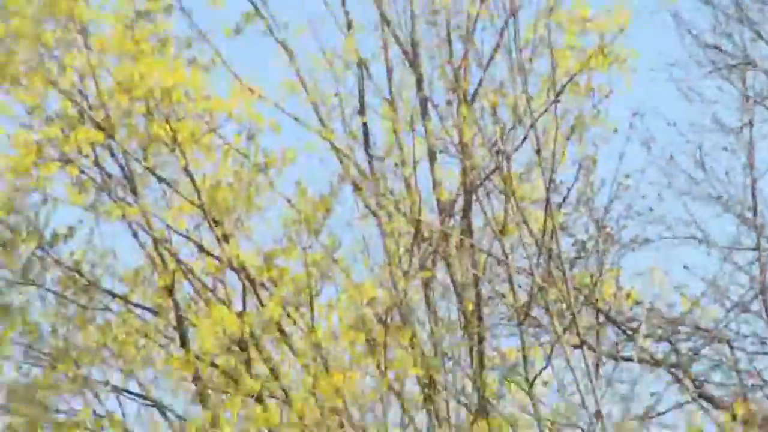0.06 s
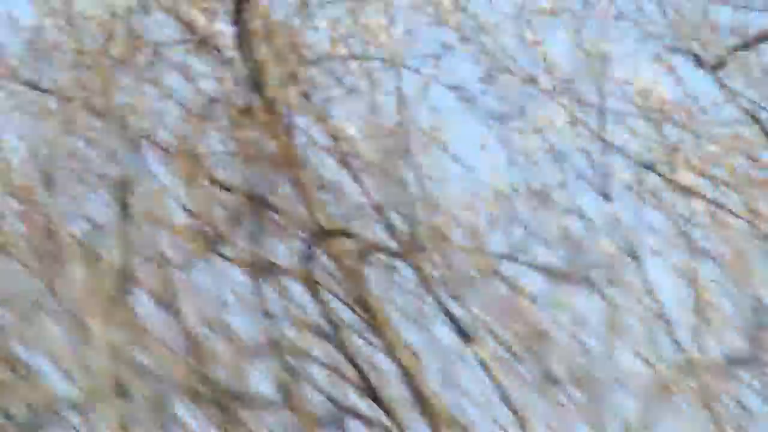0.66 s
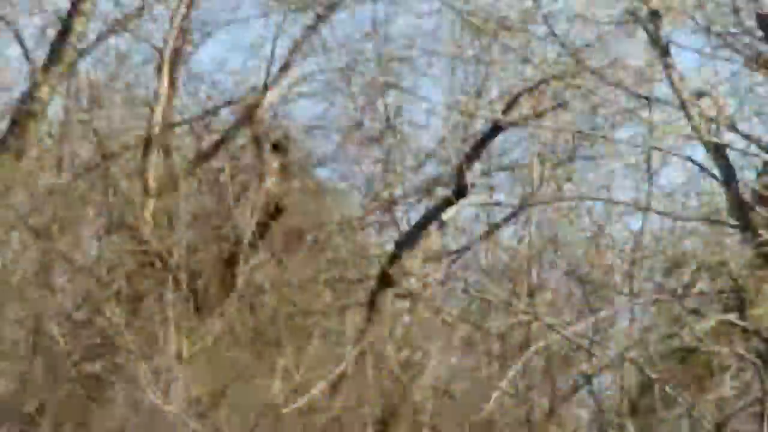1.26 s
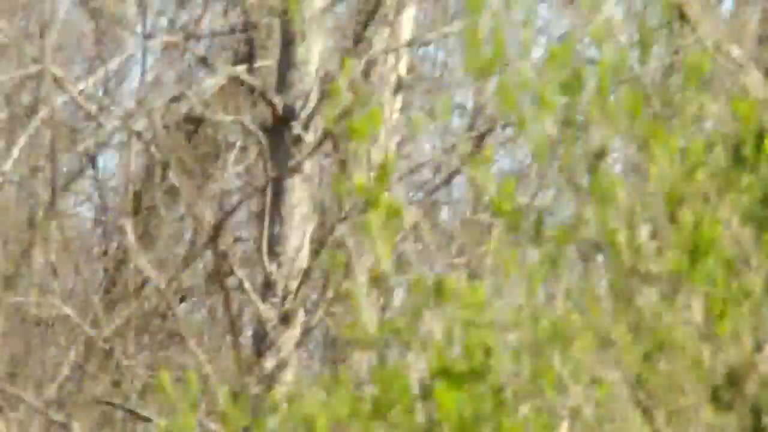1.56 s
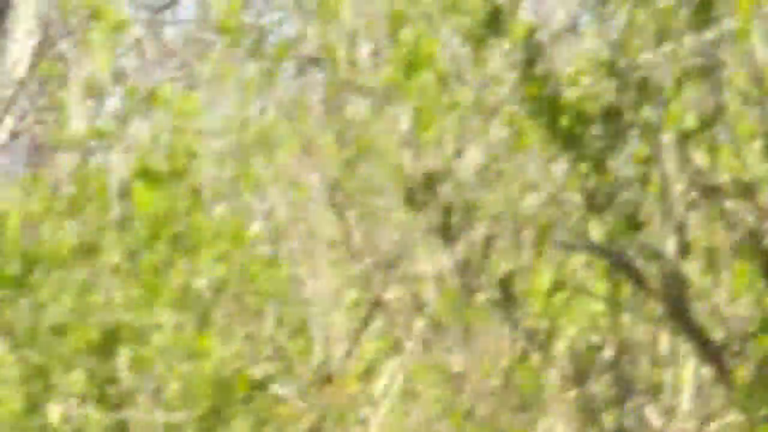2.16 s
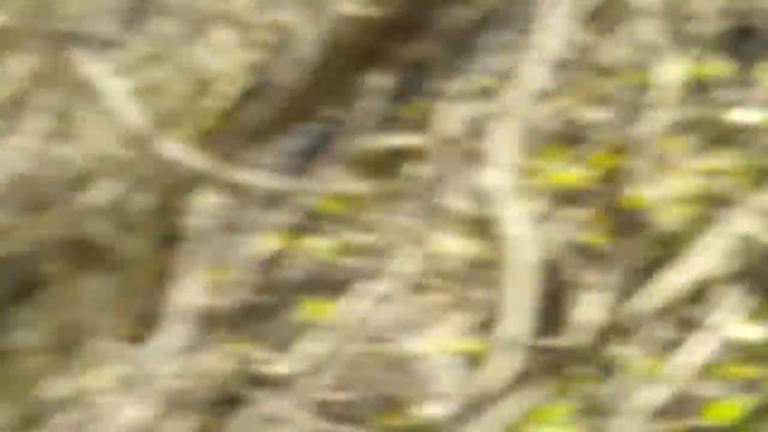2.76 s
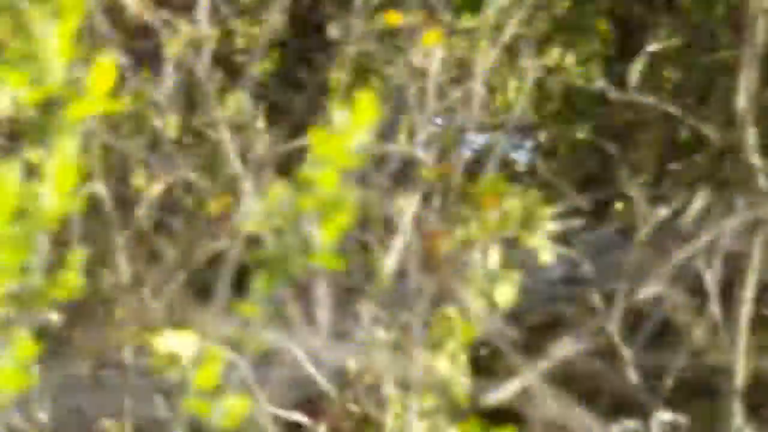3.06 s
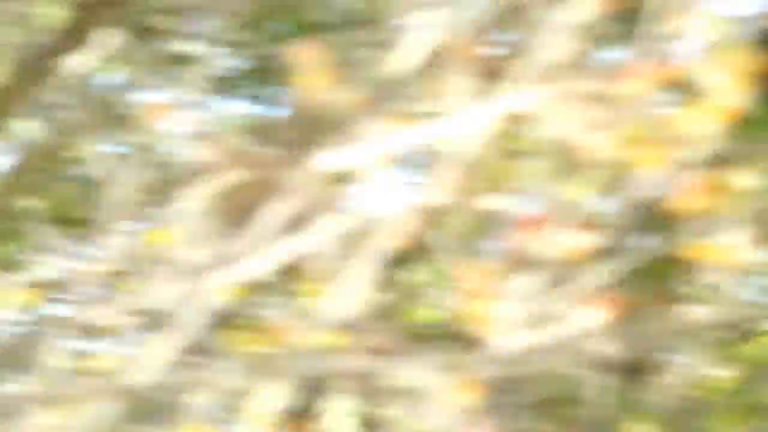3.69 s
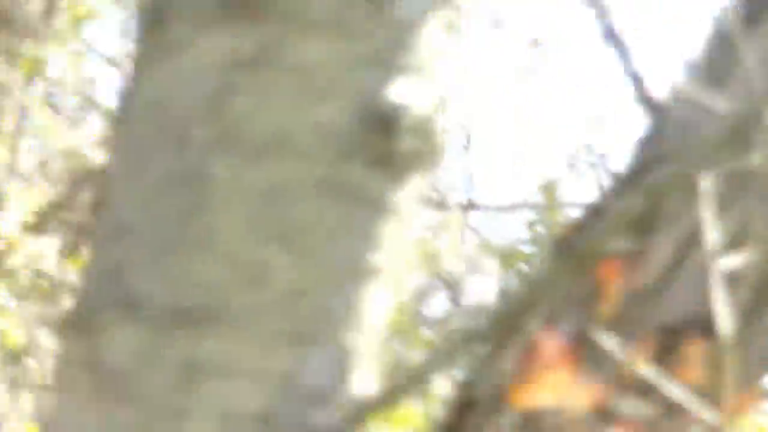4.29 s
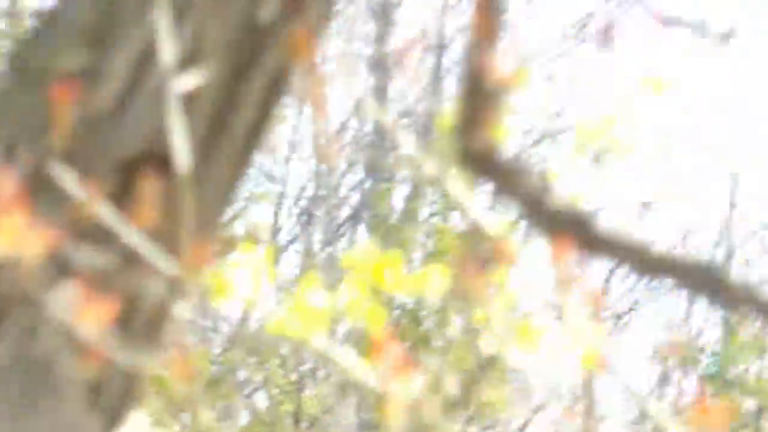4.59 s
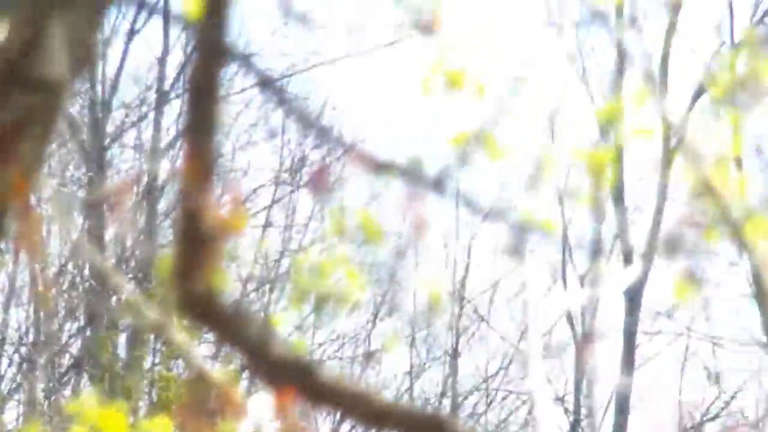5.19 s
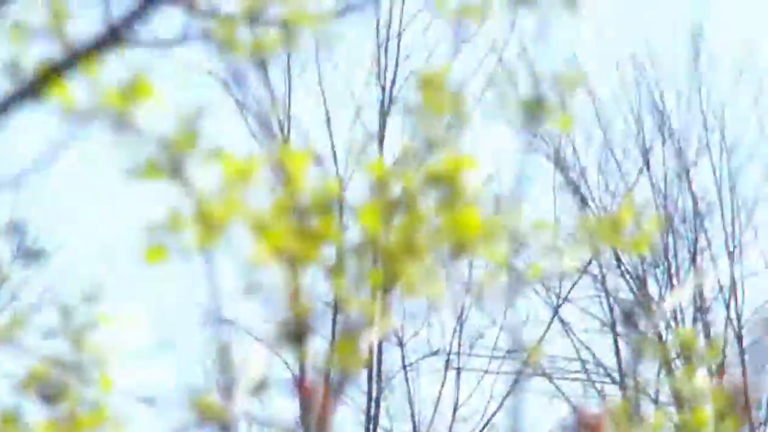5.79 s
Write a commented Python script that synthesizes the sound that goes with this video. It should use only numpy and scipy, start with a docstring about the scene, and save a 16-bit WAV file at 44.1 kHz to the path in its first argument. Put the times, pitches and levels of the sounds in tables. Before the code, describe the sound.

In quiet woods a small songbird sings a rapid, even trill in three runs, fading in the middle and returning sharper. Sleeves and fingers rub the hand-held camera through the first four seconds, with a few soft bumps and dry ticks. Toward the end a second bird adds falling whistles and far birds peep. A faint hush and thin camera whine lie behind.

```python
"""Spring woodland birds

A small songbird trills, each syllable a rising slur and a quick falling flick; a second adds falling
whistles and far birds peep. All are gliding, near-pure tones, scattered by trunks and twigs.
Sleeves and fingers rub a hand-held camera as it swings about, with soft bumps and dry ticks, one sharp.
Behind lie the thin whine of the camera, the far hush of the woods and the microphones' own noise."""
import sys
import numpy as np
from scipy import signal
from scipy.fft import rfft, irfft
from scipy.io import wavfile

SR = 44100
rng = np.random.default_rng(int(sys.argv[2]) if len(sys.argv) > 2 else 0)


def transcribe(signal):
    """Save signal, clipped to [-1, 1], as a 16-bit WAV file at the path in sys.argv[1]."""
    frames = np.atleast_2d(signal).T
    limited = np.clip(frames, -1, 1)
    pcm = np.round(limited * 32767).astype(np.int16)
    wavfile.write(sys.argv[1], SR, pcm)


N = 266496
TIME = np.arange(N) / SR

# Note shapes. Each row: offset from the note's time in seconds, pitch in Hz, relative level in dB.
SLUR_SHAPE = [(-.042, 1877, -8.5), (-.031, 2017, -8.5), (-.021, 2106, -7.5), (-.012, 2378, -5),
              (0, 2520, -1.5), (.005, 2590, -7), (.011, 2640, -37)]
SOFT_FLICK_SHAPE = [(-.009, 4150, -19), (-.005, 3700, -8), (-.002, 3280, 4), (.001, 3190, 2.5),
                    (.005, 3090, -1), (0.009, 2980, -5), (0.018, 2850, -22)]
SHARP_FLICK_SHAPE = [(-.005, 5290, -24), (-.003, 4730, -16.5), (-.001, 4100, -3), (.001, 3640, 0),
                     (.005, 3216, -17), (0.014, 3080, -10), (0.021, 3020, -35)]
WHISTLE_SHAPE = [(-.045, 2332, -26), (-.025, 2260, -8), (0, 2200, -9), (.02, 2100, -11), (.055, 1960, -16),
                 (.12, 1840, -21), (.2, 1680, -22)]
# Runs of the trill. Each row: first flick, last flick and lag of the middle syllable, all in seconds.
TRILL_RUNS = [(.807, 2.328, 0), (2.786, 4.037, -0.0048), (4.251, 6.037, .005)]
# Loudness of the trill as the camera turns. Each row: time in seconds, flick level and slur level in dB.
TRILL_LEVELS = [(.8, -43, -43), (.96, -45.5, -42), (1.26, -45.5, -40), (1.55, -44, -42),
                (1.75, -40.5, -38.5), (2.17, -43.5, -39.5), (2.5, -52, -46.5), (2.9, -57, -55),
                (3.3, -49.5, -55), (3.56, -48.5, -54), (4.04, -54, -57), (4.25, -37.5, -54.5),
                (4.45, -38.5, -47), (4.7, -41.5, -48.5), (5.05, -44.5, -51), (5.6, -39.5, -53.5),
                (6.04, -41.5, -55)]
# Steepness of the flick. Each row: time in seconds, sharpness from 0 (soft) to 1 (sharp).
FLICK_SHARPNESS = [(1.2, 0.05), (2.0, 0.09), (3.0, 0.42), (4.04, 0.58), (4.25, 1), (4.55, .95), (4.7, 0.73),
                   (5.15, .82), (5.4, 1)]
# Twigs and trunks screen the trilling bird. Each row: time in seconds, gain of its near echoes in dB.
SCREENING = [(2.4, -11), (2.9, 24), (3.5, 13), (4.05, 22), (4.25, 1), (6.0, -4)]
# The second bird's whistles. Each row: time in seconds, level in dB, pitch ratio.
WHISTLE_NOTES = [(3.95, -48.5, 0.95), (4.482, -42.5, 1.026), (4.975, -41, 0.99), (5.448, -40, 1.0),
                 (5.922, -40, 0.98)]
# Far peeps. Each row: centre in seconds, peak in dB, pitch in Hz, fall in Hz per second, length in seconds.
FAR_PEEPS = [(3.96, -58.5, 3570, 4500, 0.2), (4.341, -55, 4550, 22000, 0.038),
             (4.673, -64, 3800, 13900, 0.028), (4.68, -66, 6140, 5000, 0.025),
             (4.862, -63, 6100, 5000, .03), (4.972, -66, 5970, 5000, 0.035),
             (5.066, -62, 6300, 5000, 0.028), (5.39, -61, 6070, 5000, .03)]

# Strokes of sleeve and fingers. Each row: start and end of full contact, attack and release in seconds;
# swell over the stroke and scuff level in dB; brush, rasp and hiss in dB relative to the scuff.
RUB_STROKES = [(0, 0.024, .02, .1, -6, -51, -10, -1, 4.5), (.02, 0.263, .05, .1, 3.5, -52.5, -9, 1, 3.5),
               (0.296, 0.353, 0.15, 0.23, 1, -42, -14, 0.5, -1),
               (0.425, 0.63, 0.11, 0.063, -1, -45.5, -13, 5, 1.5),
               (0.653, 0.842, 0.06, .1, -3, -55, -3.5, 0, -3),
               (0.911, 0.945, 0.099, 0.23, 1.5, -44, -5, 0.5, -6.5),
               (1.21, 1.256, 0.093, 0.045, 4, -49.5, -1.5, -8, -7),
               (1.285, 1.36, 0.066, 0.048, 2.5, -46, -6, -6, 0.5),
               (1.53, 1.62, 0.29, .06, -1, -56, -3, -3, 0),
               (1.641, 1.718, .02, 0.089, -1.5, -50, -8, -5.5, -2.5),
               (1.84, 1.996, 0.18, 0.33, -2.5, -52.5, -4, -1, -5.5),
               (2.457, 2.585, 0.2, 0.074, 0.5, -46, -11, -2.5, -7.5),
               (2.621, 2.761, 0.16, 0.027, 0, -40, -12.5, -8, -13),
               (3.013, 3.157, 0.89, 0.51, -1.5, -51, -5, -4.5, -2.5),
               (3.54, 3.9, 0.43, 0.8, -1, -56, -6, 1.5, -3.5)]
# Friction spectra, dull to bright. Each row: frequency in Hz, relative spectral density in dB.
BRUSH_SPECTRUM = [(90, -26), (160, -21), (330, -3.5), (550, 3), (850, 7.5), (1100, 1.5), (1600, -17),
                  (4000, -40), (16000, -56)]
SCUFF_SPECTRUM = [(300, -38), (700, -12), (1000, 1.5), (1300, 4.5), (1800, 2.5), (2200, 1.5), (2700, -6),
                  (3300, -9.5), (4500, -34), (16000, -32)]
RASP_SPECTRUM = [(1500, -28.5), (2300, -5), (2750, -7.5), (3300, -5), (3900, -2.5), (4600, -1.5),
                 (5600, 0.5), (6500, -2), (9000, -21.5), (12000, -20), (16000, -32)]
HISS_SPECTRUM = [(3000, -20), (4800, -45), (5800, 0), (6800, 4), (7600, 3), (8600, -1.5), (10000, -9),
                 (12000, -21.5), (16000, -15)]
# Bumps of the hand on the camera. Each row: start in seconds, level in dB, pitch in Hz.
HAND_BUMPS = [(0.569, -47, 407), (1.147, -41.5, 430), (1.169, -37.5, 454), (1.346, -47.5, 328),
              (1.361, -51, 260), (1.706, -39, 340), (1.709, -55, 150), (1.721, -45, 393)]
# Ticks of the casing. Each row: start in seconds, strength of the impulse in dB.
CASING_TICKS = [(.341, -31.5), (.92, -37), (1.36, -33.5), (1.652, -48), (2.766, -51), (5.2996, -24)]
# Modes of the casing. Each row: frequency in Hz, gain in dB, time to decay by 60 dB in seconds.
CASING_MODES = [(570, -16, 0.019), (1290, -38, .007), (1880, 3, 0.0091), (2260, -30, .008)]

# Tones of the camera's works. Each row: frequency in Hz, rms level in dB.
WHINE_TONES = [(1041, -66.5), (1416, -77), (11864.5, -71.5), (15465, -78), (15524, -85), (15584, -81),
               (15644, -75), (15704, -87)]
# Spectra of the far woods, the microphones' self-noise and the air on their ports.
# Each row: frequency in Hz, relative spectral density in dB.
WOODS_SPECTRUM = [(100, -16.5), (160, -14.5), (300, -9), (450, -8.5), (600, -4), (950, 1.5), (1450, -4),
                  (2100, -5), (2700, -7.5), (3300, -9.5), (4500, -13.5), (6500, -13), (8500, -18),
                  (16000, -21)]
SELF_NOISE_SPECTRUM = [(20, 7.5), (60, -5), (130, -12), (300, -14.5), (700, -28.5), (2000, -43),
                       (15000, -20)]
BUFFET_SPECTRUM = [(30, 3), (90, -19), (400, -50), (2000, -90)]


def trill(slur_lead_s=.033, lead_shrink_s=.008, slur_rise=.0384, onset_loss_db=2):
    """Frequency sweeps in pairs: a slur glides up, a flick drops, and the wood scatters both."""
    song = np.zeros(N)
    for s in syllable_times():
        flick_db, slur_db = at_time(TRILL_LEVELS, s) + .34 * rng.standard_normal(2)
        sharp = np.clip(at_time(FLICK_SHARPNESS, s)[0] + .07 * rng.standard_normal(), 0, 1)
        # before a sharper flick the slur starts more softly, comes later and lies higher
        slur = np.array(SLUR_SHAPE, float)
        onset_weight = np.maximum(slur[:, 0] / slur[0, 0], 0)
        slur[:, 2] -= onset_loss_db * sharp * onset_weight
        add_note(song, s - slur_lead_s + lead_shrink_s * sharp, slur_db, slur, 1 + slur_rise * sharp)
        flick = (1 - sharp) * np.array(SOFT_FLICK_SHAPE) + sharp * np.array(SHARP_FLICK_SHAPE)
        add_note(song, s, flick_db, flick)
    # the wood returns mostly the lower end of each flick
    scattered = butterworth(song, 4, 3600, "low")
    screened = scattered * from_db(at_time(SCREENING, TIME)[0])
    trunk_band = butterworth(screened, 3, [2850, 3300], "band")
    wood = tree_echoes(scattered, wet_db=-8.5, t60=.31, build_s=.0074)
    near_trunks = tree_echoes(trunk_band, wet_db=-8, t60=.16, build_s=.011, delay_s=.008)
    return song + wood + near_trunks


def syllable_times(period_s=.152):
    """Near-periodic repetition: a parabolic lag bends the even pace of each run a little."""
    times = []
    for first, last, lag in TRILL_RUNS:
        along = np.linspace(0, 1, round((last - first) / period_s) + 1)
        bend = 1 - (2 * along - 1) ** 2
        times.extend(first + (last - first) * along + lag * bend)
    return times


def add_note(out, s, note_db, shape, pitch_ratio=1):
    """Frequency modulation: a sine's phase integrates a pitch contour, never twice quite the same."""
    offsets, hz, level_db = np.transpose(shape)
    hz = hz * pitch_ratio * (1 + .0075 * rng.standard_normal(len(offsets)))
    level_db = level_db + 1.2 * rng.standard_normal(len(offsets))
    t = np.arange(offsets[0], offsets[-1], 1 / SR)
    phase = 2 * np.pi * np.cumsum(np.interp(t, offsets, hz)) / SR
    envelope = from_db(note_db + np.interp(t, offsets, level_db))
    add(out, s + offsets[0], envelope * np.sin(phase))


def whistler():
    """Interference with close echoes makes a farther bird's whistles waver; later echoes form a tail."""
    song = np.zeros(N)
    for s, level_db, pitch_ratio in WHISTLE_NOTES:
        add_note(song, s, level_db, WHISTLE_SHAPE, pitch_ratio)
    early = tree_echoes(song, wet_db=-8, t60=.18, build_s=.0075)
    late = tree_echoes(song, wet_db=-1.5, t60=.69, build_s=.065)
    return song + early + late


def far_birds():
    """Linear chirps: short falling peeps swell and fade, their reverberation almost as strong."""
    peeps = np.zeros(N)
    for s, peak_db, hz, fall, length in FAR_PEEPS:
        t = np.arange(-length / 2, length / 2, 1 / SR)
        chirp = np.sin(2 * np.pi * (hz - fall * t / 2) * t)
        add(peeps, s - length / 2, from_db(peak_db) * np.hanning(len(t)) * chirp)
    return peeps + tree_echoes(peeps, wet_db=-1, t60=.6, build_s=.013)


def tree_echoes(x, wet_db, t60, build_s, delay_s=0):
    """Scattering by trunks and twigs: a tail of echoes builds up, then falls 60 dB in t60 seconds."""
    t = np.maximum(TIME[:SR] - delay_s, 0)
    response = rng.standard_normal(SR) * from_db(-60 * t / t60) * (1 - np.exp(-t / build_s))
    return from_db(wet_db) * signal.fftconvolve(x, response / np.linalg.norm(response))[:N]


def rustle():
    """Sliding friction of cloth and skin: the casing gives a brush and a scuff, the weave rasp and hiss."""
    power = np.zeros((4, N))   # overlapping strokes add in power
    for on, off, attack, release, swell_db, scuff_db, brush_db, rasp_db, hiss_db in RUB_STROKES:
        envelope = from_db(scuff_db + stroke_db(on, off, attack, release, swell_db))
        power += np.outer(from_db([brush_db, 0, rasp_db, hiss_db]) ** 2, envelope ** 2)
    brush, scuff, rasp, hiss = np.sqrt(power)
    return (brush * friction(BRUSH_SPECTRUM, grain_db=0, judder_db=1.65)
            + scuff * friction(SCUFF_SPECTRUM, grain_db=1, judder_db=.5)
            + rasp * friction(RASP_SPECTRUM, grain_db=1, judder_db=.53)
            + hiss * friction(HISS_SPECTRUM, grain_db=2, judder_db=0))


def stroke_db(on, off, attack, release, swell_db, fade_db=20):
    """Exponential envelope: a stroke gathers speed, slides on while swelling or easing, and dies away."""
    swell = np.interp(TIME, [on, off], [-swell_db / 2, swell_db / 2])
    outside = np.maximum(on - TIME, 0) / attack + np.maximum(TIME - off, 0) / release
    return np.maximum(swell - fade_db * outside, -100)


def friction(spectrum, grain_db, judder_db):
    """Stick and slip: countless fibres catch and let go, each at its own strength, as pressure wavers."""
    slips = rng.standard_normal(N) * from_db(grain_db * drift(1500))
    pressure = rms_one(from_db(judder_db * drift(70)))
    return coloured(slips, spectrum) * pressure


def bumps(t60=.061, rise_s=.00069, upper_ratio=1.32, upper_db=-6):
    """Damped vibration: a soft push excites two low modes of the grip."""
    out, t = np.zeros(N), TIME[:SR // 5]
    for s, level_db, hz in HAND_BUMPS:
        phase = 2 * np.pi * hz * t
        modes = np.sin(phase) - from_db(upper_db) * np.sin(upper_ratio * phase)
        envelope = from_db(level_db - 60 * t / t60) * (1 - np.exp(-t / rise_s))
        add(out, s, envelope * modes)
    return out


def ticks(lowest_hz=650, contact_hz=2700):
    """Impulse response: the plastic casing gives under the fingers and rings; nearby twigs echo it."""
    clicks = np.zeros(N)
    for s, strength_db in CASING_TICKS:
        add(clicks, s, from_db([strength_db]))
    modes = sum(from_db(db) * ring(clicks, hz, t60) for hz, db, t60 in CASING_MODES)
    casing = butterworth(modes, 2, [lowest_hz, contact_hz], "band")
    return casing + tree_echoes(casing, wet_db=-18, t60=.13, build_s=.005)


def ring(clicks, hz, t60):
    """Resonance: a unit impulse starts a decaying sine of height 1."""
    decay, step = from_db(-60 / (t60 * SR)), 2 * np.pi * hz / SR
    return signal.lfilter([0, np.sin(step)], [1, -2 * decay * np.cos(step), decay ** 2], clicks + 1e-18)


def whine(flutter_rad=.12):
    """Periodic vibration: the camera's works give thin steady tones that flutter slightly in phase."""
    out = np.zeros(N)
    for hz, rms_db in WHINE_TONES:
        phase = 2 * np.pi * hz * TIME + flutter_rad * drift(10) + rng.uniform(0, 2 * np.pi)
        out += np.sqrt(2) * from_db(rms_db) * np.sin(phase)
    return out


def background(woods_db=-55, microphone_db=-66, buffet_db=-78):
    """Broadband noise: the far hush is coherent in both channels, self-noise and air buffeting are not."""
    woods = coloured(rng.standard_normal(N), WOODS_SPECTRUM)
    self_noise = np.array([coloured(rng.standard_normal(N), SELF_NOISE_SPECTRUM) for _ in range(2)])
    gusts = rms_one(from_db(4 * drift(18)))
    buffets = gusts * np.array([coloured(rng.standard_normal(N), BUFFET_SPECTRUM) for _ in range(2)])
    return from_db(woods_db) * woods + from_db(microphone_db) * self_noise + from_db(buffet_db) * buffets


def coloured(x, spectrum):
    """Spectral shaping: weight x by a table read on a log-frequency axis, then scale to rms 1."""
    hz = np.linspace(0, SR / 2, N // 2 + 1)
    known_hz, known_db = np.transpose(spectrum)
    gain = from_db(np.interp(np.log(hz + 1), np.log(known_hz), known_db))
    return rms_one(irfft(rfft(x) * gain, N))


def butterworth(x, order, hz, kind):
    """Filtering with a maximally flat passband."""
    return signal.sosfilt(signal.butter(order, hz, kind, fs=SR, output="sos"), x)


def drift(rate_hz):
    """Random fluctuation of rms 1, with rate_hz new values a second."""
    knots = rng.standard_normal(int(N / SR * rate_hz) + 2)
    return rms_one(np.interp(TIME * rate_hz, np.arange(len(knots)), knots))


def at_time(curve, s):
    """Linear interpolation of each column of a curve at time s."""
    known_s, *columns = np.transpose(curve)
    return [np.interp(s, known_s, column) for column in columns]


def add(out, start_s, sound):
    """Superposition of a sound from its start time on."""
    i = max(0, round(start_s * SR))
    out[i:i + len(sound)] += sound[:max(0, N - i)]


def from_db(db):
    """Amplitude ratio of a level in decibels."""
    return 10 ** (np.asarray(db) / 20)


def rms_one(x):
    """Normalisation to rms 1."""
    return x / np.sqrt(np.mean(x ** 2) + 1e-20)


def scene():
    """Superposition: birds and handling sit in the middle of a narrow stereo image."""
    return trill() + whistler() + far_birds() + rustle() + bumps() + ticks() + whine() + background()


def record(dry, notch_hz=7880, cutoff_hz=15900):
    """Frequency response of the camera: a narrow notch in the treble and a steep cut at the top."""
    notched = signal.lfilter(*signal.iirnotch(notch_hz, Q=20, fs=SR), dry)
    return signal.sosfilt(signal.ellip(12, .1, 70, cutoff_hz, fs=SR, output="sos"), notched)


dry = scene()
out = record(dry)
transcribe(out)
```